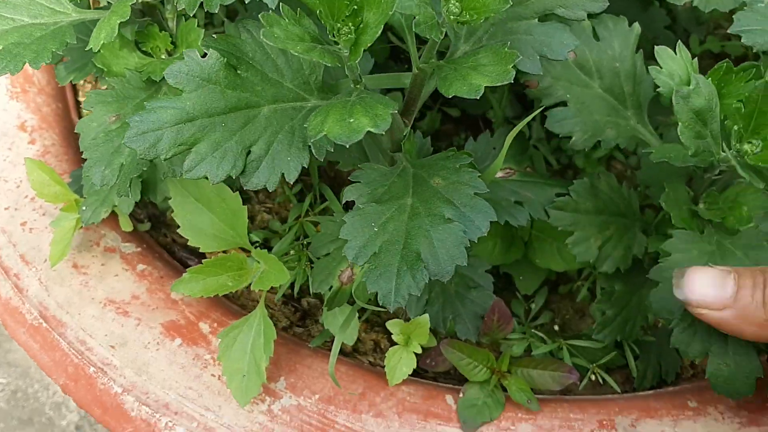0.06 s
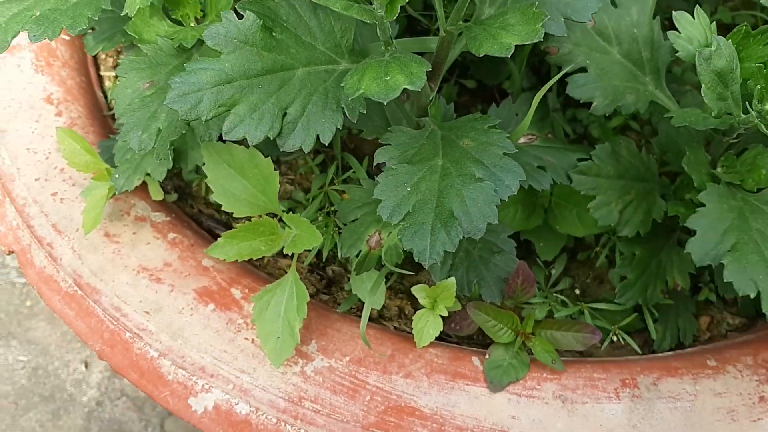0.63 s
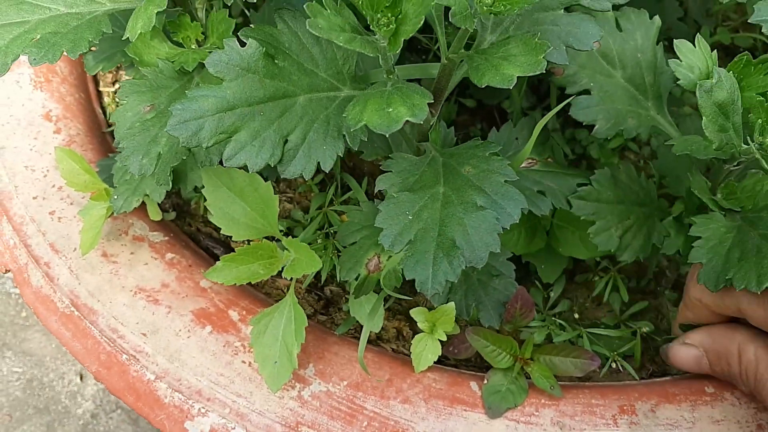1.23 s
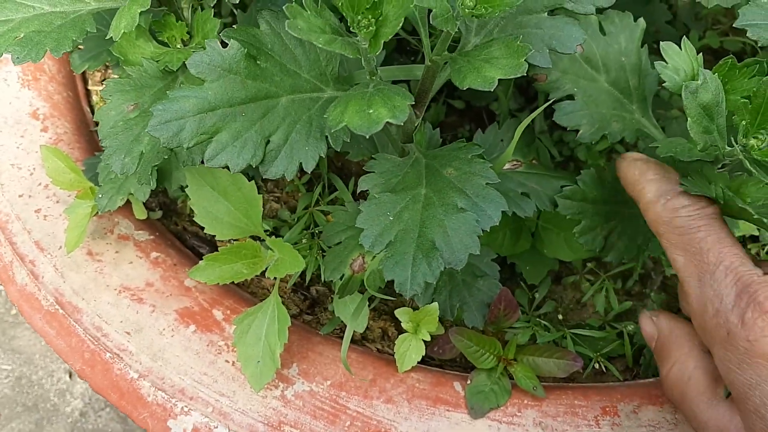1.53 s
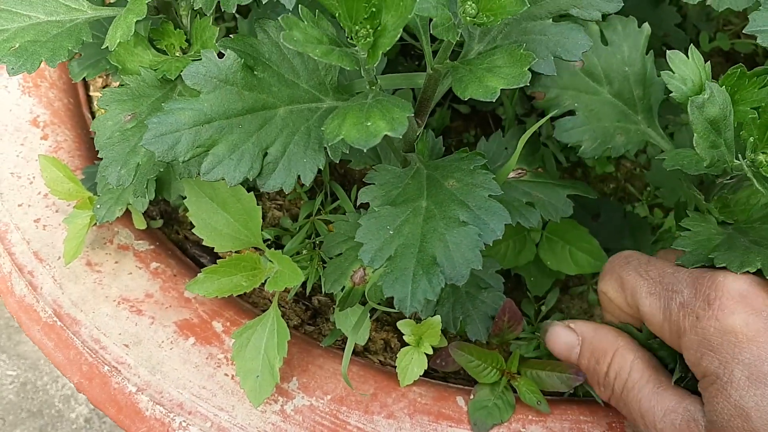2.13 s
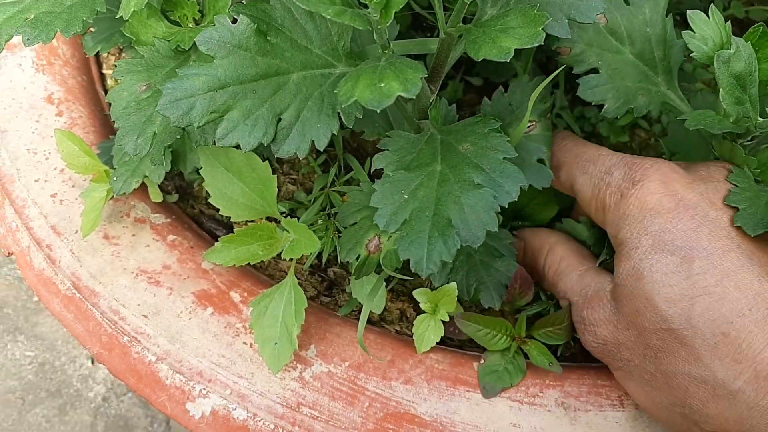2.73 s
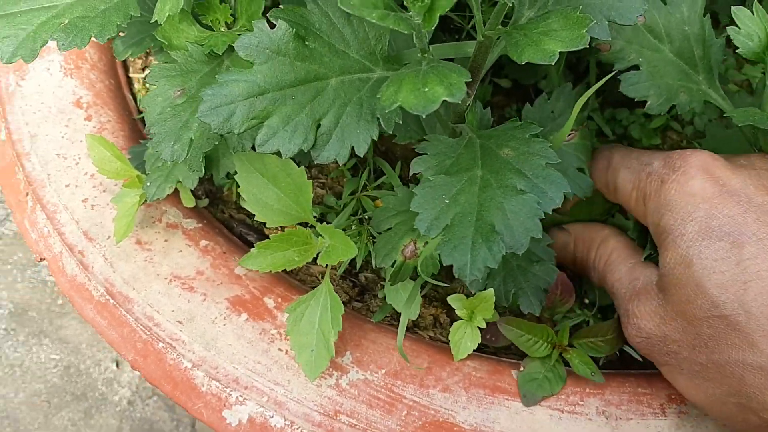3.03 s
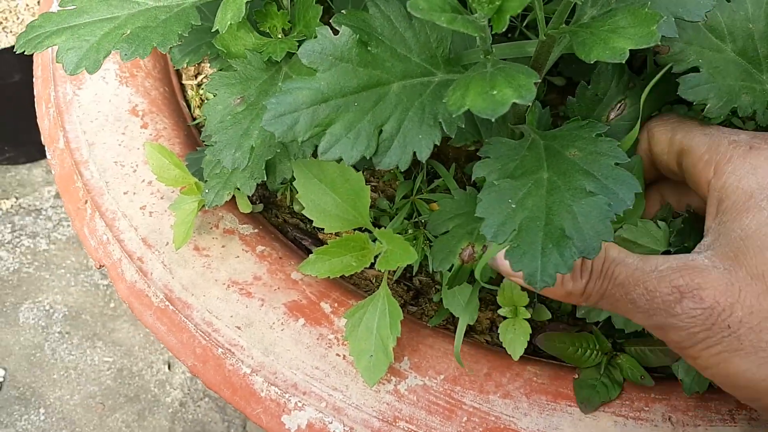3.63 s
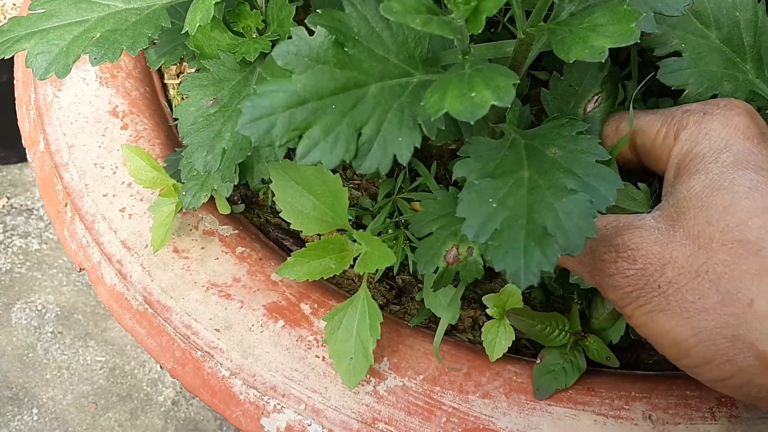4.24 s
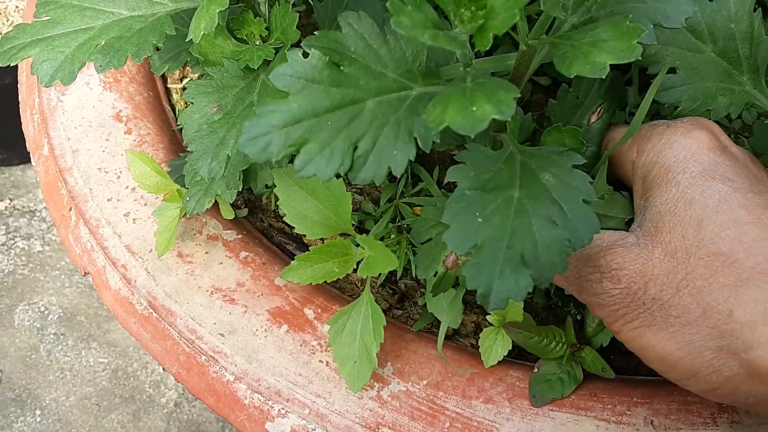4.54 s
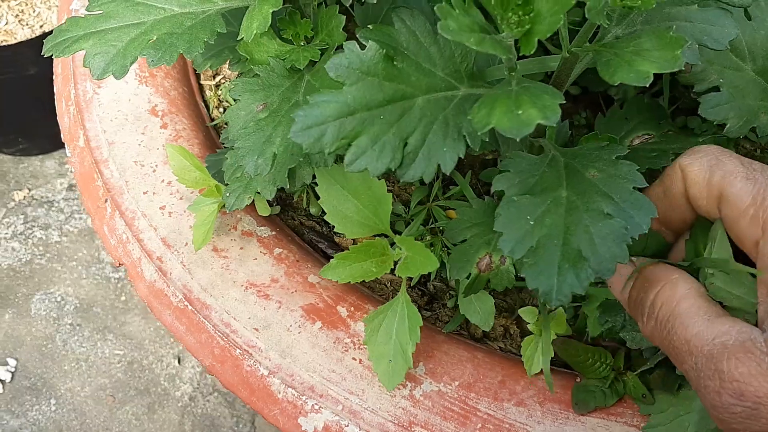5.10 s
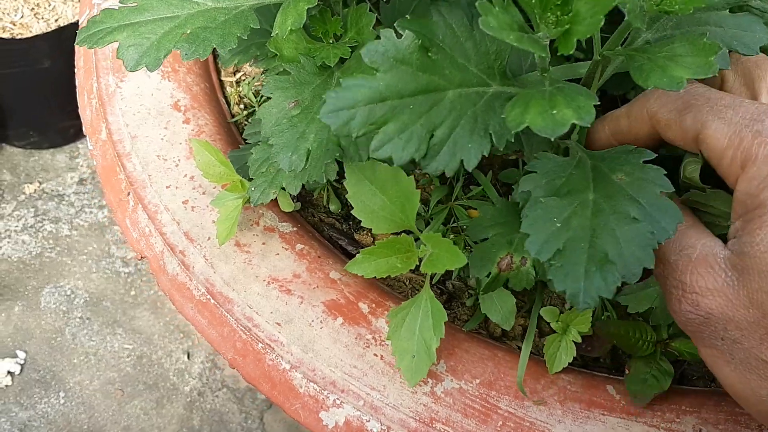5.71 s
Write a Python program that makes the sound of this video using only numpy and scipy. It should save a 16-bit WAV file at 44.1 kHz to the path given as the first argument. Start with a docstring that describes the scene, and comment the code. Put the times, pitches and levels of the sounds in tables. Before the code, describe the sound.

Leaves rustle and crackle close by as a hand pulls weeds from a clay pot, with small, sharp stem snaps.

```python
"""Outdoors at a clay plant pot, a hand pulling weeds close to the left microphone.
Leaves slide over skin and each other in dense tiny slips; stems snap, and one gives a short wet squeak.
The right microphone is shaded from the plant and hears it largely off nearby surfaces.
Dull bumps and scuffs from soil and pot sit near the middle, over a faint far rumble and airy hiss."""
import sys
import numpy as np
from scipy import signal
from scipy.fft import rfft, irfft, next_fast_len
from scipy.io import wavfile
from scipy.ndimage import uniform_filter1d, map_coordinates

SR = 44100
rng = np.random.default_rng(int(sys.argv[2]) if len(sys.argv) > 2 else 0)


def to_wav(s):
    """Save 16-bit WAV."""
    ch = np.atleast_2d(s).T  # columns
    pcm = np.round(np.clip(ch, -1, 1) * 32767)  # PCM
    wavfile.write(sys.argv[1], SR, pcm.astype(np.int16))


N = 262868

# the hand through the leaves: (start [s], length [s], level [dB], relative fizz [dB], grip [dB])
HAND_STROKES = [(0.026, 0.034, -42, -5.5, -2), (0.085, 0.013, -46, 3, 3.5), (0.14, 0.049, -48.5, 2.5, 0.5),
                (0.253, 0.053, -46, -1.5, -2.5), (0.472, 0.16, -47, -1.5, -13),
                (0.676, 0.15, -44, -1.5, -1), (0.835, 0.077, -46, -0.5, 3), (0.914, 0.11, -41.5, 0, 2),
                (1.135, 0.065, -40.5, 0.5, 1), (1.19, 0.13, -45, -5.5, 0.5), (1.393, 0.03, -36.5, 1, -5),
                (1.559, 0.22, -44.5, -0.5, 4), (1.859, 0.084, -45, -2, -4.5), (1.967, 0.12, -43, 0, 1.5),
                (2.086, 0.062, -46, -7, 7.5), (2.205, 0.049, -40, -5, -2), (2.315, 0.21, -48, -1.5, -7.5),
                (2.613, 0.046, -52.5, 1, 2.5), (2.892, 0.031, -43.5, -3, -2.5), (3.157, 0.13, -48.5, -5, 3),
                (3.333, 0.049, -49, 5, 1.5), (3.474, 0.077, -50.5, -2.5, 4), (3.567, 0.072, -56.5, -5, 2.5),
                (3.685, 0.074, -47, -14, -3.5), (3.802, 0.12, -51, 1, 3.5), (3.951, 0.058, -53.5, -2, 0.5),
                (4.072, 0.16, -58.5, -3.5, -4.5), (4.284, 0.087, -50.5, -1, -5),
                (4.444, 0.05, -49, -3, -11.5), (4.636, 0.11, -48, -3, 1), (4.827, 0.11, -45.5, -1.5, -0.5),
                (4.935, 0.072, -40, 1.5, 2), (5.019, 0.057, -39.5, 1.5, 3.5), (5.114, 0.11, -43.5, 0.5, 1),
                (5.274, 0.078, -49, -0.5, 4.5), (5.373, 0.088, -46.5, -0.5, -1), (5.561, 0.12, -51, -3, -3),
                (5.717, 0.022, -42.5, -3.5, -4.5), (5.763, 0.11, -48, -8, -4)]
# leaves resting against the hand between strokes: (time [s], level [dB])
LEAF_TOUCH = [(0, -53), (0.22, -56.5), (0.42, -52), (0.9, -62), (1.07, -50.5), (1.36, -47.5), (1.83, -54.5),
              (2.05, -49.5), (2.5, -50), (2.72, -57), (2.98, -54.5), (3.1, -59.5), (3.3, -51), (3.8, -52),
              (4.04, -60.5), (4.8, -50), (5.3, -54.5), (5.96, -58.5)]
# stems and leaf ribs breaking:
# (time [s], relative level [dB], relative fizz [dB], relative body [dB], ring [Hz])
STEM_SNAPS = [(0.093, -43, -10, -20, 4570), (0.8863, -37, -1, -24, 5900), (0.947, -33, -4, -26, 3450),
              (1.1455, -27, -3, -18, 5200), (1.4067, -33.5, -3, -39, 4000), (1.4202, -34, 1, -41, 4500),
              (1.434, -32, 1, -40, 4600), (1.442, -46, 12, -26, 4200), (1.4556, -31, 10, -26, 4080),
              (1.5028, -33.5, 2.5, -44, 4200), (1.5603, -37.5, 6.5, -31, 5360),
              (1.5982, -31, -23, -14, 4500), (1.6838, -18.5, -3, -13, 3900), (1.8631, -30, 8.5, -28, 6650),
              (1.899, -33, -1, -18, 7300), (1.956, -23.5, -4.5, -20.5, 4860),
              (2.2538, -17.5, 0.5, -27, 5700), (2.261, -32.5, 4, -14, 6700), (2.5687, -48, 14, -11, 6300),
              (2.944, -44, 11, -31, 6200), (3.1294, -42, 1, -21, 6630), (3.1359, -24.5, -3.5, -15, 5640),
              (3.856, -47, 8, -10.5, 6150), (4.148, -41, -5, -29, 3600), (4.5335, -25.5, -7, -21.5, 6200),
              (4.6409, -33.5, -0.5, -15, 6350), (4.6525, -32.5, -7, -10.5, 5230),
              (4.7027, -38, 0.5, -19, 4720), (4.883, -31, 0, -25, 5460), (5.123, -24, 6.5, -8, 4080),
              (5.3323, -38, -0.5, -20, 5850), (5.7177, -41, -10, -27, 6000), (5.7829, -37, -3, -27, 5600)]
# a stem slipping through the fingers: (time [s], pitch [Hz], relative level [dB])
SQUEAK_PATH = [(5.122, 500, -82), (5.129, 492, -56), (5.14, 490, -51.5), (5.156, 647, -48.5),
               (5.175, 624, -49), (5.19, 643, -48), (5.2, 655, -80)]
# harmonics of that squeak: (multiple of the pitch, relative level [dB])
SQUEAK_HARMONICS = [(1, 5.5), (2, 2.5), (3, 2.5), (4, -16), (6, -11)]
# broad leaves brushing past: (time [s], level [dB], length [s], pitch [Hz])
LEAF_BRUSHES = [(0.287, -68.5, 0.13, 994), (0.58, -60, 0.046, 1150), (0.63, -69, 0.061, 880),
                (0.784, -60.5, 0.065, 915), (.96, -82, 0.047, 785), (1.052, -61, 0.028, 926),
                (1.192, -59.5, 0.069, 1070), (5.218, -55.5, 0.014, 1400)]
# soft knocks in the pot: (time [s], relative level [dB], pitch [Hz])
POT_BUMPS = [(0.099, -50, 309), (0.922, -49.5, 262), (1.147, -46, 587), (1.685, -61, 610),
             (3.135, -38.5, 700), (3.138, -38.5, 310), (3.139, -46.5, 126), (3.584, -60, 171),
             (3.817, -51, 402), (4.079, -49, 126), (4.652, -38, 1050), (4.743, -47, 170)]
# scuffing on soil and pot, and the distant rumble: (time [s], level [dB])
SCUFF_LEVELS = [(0, -75), (0.4, -70.5), (0.8, -77.5), (1.15, -71), (1.45, -76), (1.7, -69), (2.0, -80.5),
                (3.08, -80.5), (3.17, -68), (3.33, -93), (3.62, -80.5), (3.92, -79.5), (4.1, -74),
                (4.42, -81), (4.72, -74), (5.2, -75), (5.45, -75.5), (5.96, -79)]
RUMBLE_LEVELS = [(0, -62.5), (1.8, -64.5), (2.8, -71), (3.5, -71.5), (3.62, -64.5), (3.74, -69.5),
                 (4.7, -64.5), (5.96, -65)]

# spectra of the plant, close up: (frequency [Hz], relative level [dB])
LEAF_SPECTRUM = [(2800, -36), (4300, -2), (5300, 0.5), (6700, -1), (7600, -9.5), (9500, -22)]  # bright sliding
FIZZ_SPECTRUM = [(5500, -48), (7600, -11.5), (8500, -1.5), (10000, 2), (13000, 3.5), (15800, 2.5)]  # highest treble
RASP_SPECTRUM = [(1400, -41), (2200, -7), (3200, -1), (3900, 1.5), (4500, -6.5), (5900, -6.5)]  # gripped leaves
BODY_SPECTRUM = [(250, -27), (700, -16), (1100, -9.5), (1300, -8), (1700, -1), (2150, -3), (3000, -6)]  # flexing blades
CRACK_SPECTRUM = [(1200, -48), (2200, -12.5), (3600, 0), (5300, -1), (6700, 3), (7600, -4), (9500, -29)]  # breaking fibres
# spectra of the soil and the background: (frequency [Hz], relative level [dB])
SCUFF_SPECTRUM = [(120, -27), (220, 5), (330, 2.5), (550, -6.5), (800, -10), (1400, -16)]
RUMBLE_SPECTRUM = [(20, -38), (35, -20), (50, -7.5), (63, -0.5), (78, 2), (92, -2.5), (125, -4.5),
                   (160, -8.5), (220, -19), (400, -35.5)]
AIR_SPECTRUM = [(100, 13), (300, -19), (1000, -7.5), (5000, -18), (16000, -14)]
# shading of the plant at the right microphone: (frequency [Hz], relative gain [dB])
RIGHT_SHADOW = [(200, -11.5), (500, -5), (1000, -11), (2000, -19), (4000, -25.5), (8500, -21), (11000, -24),
                (16000, -43)]


def rustle(levels):
    """Leaf hairs catch and let go close to the microphone: dense grain and sparser ticks."""
    ticks = slips(rate=350, spread_db=3, t60=0.007)
    pressure = amp(0.35 * wobble(17) + 1.54 * wobble(45))  # wanders within a stroke
    out = np.zeros(N)
    for spectrum, level in zip([LEAF_SPECTRUM, FIZZ_SPECTRUM, RASP_SPECTRUM, BODY_SPECTRUM], levels):
        grain = slips(rate=3000, spread_db=2, t60=0.015)
        friction = coloured(patchy(rng.standard_normal(N), depth_db=2.5), spectrum)
        out += level * np.sqrt(0.72 * grain + 0.091 * ticks) * friction
    return pressure * out


def hand_effort(attack_s=0.016, release_s=0.019, arch_db=2.0):
    """Amplitudes of the four rustle registers: strokes take hold and die away over a light touch."""
    t = np.arange(N) / SR
    touch_db, = curves(LEAF_TOUCH)
    touch_grip_db = -1.5 + 0.19 * (touch_db + 59)  # a louder touch grips harder
    power = (registers(fizz_db=-2, grip_db=touch_grip_db) * amp(touch_db)) ** 2
    for start, length, db, fizz_db, grip_db in HAND_STROKES:
        span = slice(*np.searchsorted(t, [start, start + length + 10 * release_s]))
        age = t[span] - start
        shape = np.minimum(age / attack_s, 1) * np.exp(-np.maximum(age - length, 0) / release_s)
        # loudest mid-stroke, where the hand moves fastest
        shape *= amp(arch_db * (np.sin(np.pi * np.minimum(age / length, 1)) - 2 / np.pi))
        power[:, span] += (registers(fizz_db, grip_db) * amp(db) * shape) ** 2
    return np.sqrt(power)


def registers(fizz_db, grip_db):
    """Gain rows for leaf, fizz, rasp and body: a firmer grip makes leaves rasp and their blades flex."""
    rasp_db = -4.5 + grip_db
    body_db = -16 + 1.34 * grip_db
    return amp(np.vstack(np.broadcast_arrays(0, fizz_db, rasp_db, body_db)))


def crackle(leaf_level, level_db=-10, fizz_db=-3):
    """Tiny ribs give way at random, louder the harder the hand works."""
    envelope = np.sqrt(np.abs(slips(rate=86, spread_db=3.5, t60=0.01)))
    pops = envelope * rng.standard_normal((2, N))
    cracks = coloured(pops[0], CRACK_SPECTRUM) + amp(fizz_db) * coloured(pops[1], FIZZ_SPECTRUM)
    return amp(level_db) * leaf_level * cracks


def snaps(crack_t60=0.0023, shiver_t60=0.015, shiver_db=-14, stem_t60=0.0098, resonance_db=5):
    """A stem breaks sharply and rings briefly; the leaf on it shivers a little longer."""
    out, lead = np.zeros(N), 64  # samples ahead of the break
    t = np.maximum(np.arange(SR // 25) - lead, 0) / SR
    attack = 1 - np.exp(-t / 0.00046)
    shape = (amp(-60 * t / crack_t60) + amp(shiver_db - 60 * t / shiver_t60)) * attack
    burst_gain = np.sqrt(0.004 * SR / len(t))  # rms 1 becomes the energy of a 4 ms burst
    for start, db, fizz_db, body_db, hz in STEM_SNAPS:
        fibres = rng.standard_normal((3, len(t))) * shape
        # the stem's own resonance colours the crack of its fibres
        resonant = filtered(fibres[0], lambda f: 1 + amp(resonance_db) / (1 + ((f - hz) / 750) ** 2))
        crack = 1.16 * coloured(resonant, CRACK_SPECTRUM)
        fizz = amp(fizz_db) * coloured(fibres[1], FIZZ_SPECTRUM)
        body = amp(body_db) * coloured(fibres[2], BODY_SPECTRUM)
        ring = 0.41 * unit(np.sin(2 * np.pi * hz * t) * attack * amp(-60 * t / stem_t60))
        add(out, start - lead / SR, amp(db - 2) * burst_gain * (crack + fizz + body + ring))
    return out


def squeak():
    """A moist stem sticks and slips at a rising, slightly unsteady rate."""
    hz, db = curves(SQUEAK_PATH)
    phase = 2 * np.pi * np.cumsum(hz * (1 + 0.031 * wobble(400))) / SR
    tone = sum(amp(level + 1.4 * wobble(120)) * np.sin(k * phase) for k, level in SQUEAK_HARMONICS)
    t = np.arange(N) / SR
    slipping = (t > SQUEAK_PATH[0][0]) & (t < SQUEAK_PATH[-1][0])
    return amp(db + 1) * unit(tone) * slipping


def brushes():
    """Broad leaves sweep past the hand with a soft, hollow sound."""
    t = np.arange(N) / SR
    sweeps = sum(amp(db) * np.exp(-2 * ((t - centre) / length) ** 2) * noise_band(hz, width_hz=340)
                 for centre, db, length, hz in LEAF_BRUSHES)
    return sweeps * np.sqrt(slips(rate=400, spread_db=2.5, t60=0.015))


def bumps(t60_cycles=9.5):
    """Roots give way and knuckles meet soil and pot: heavily damped knocks."""
    out, t = np.zeros(N), np.arange(SR // 4) / SR
    attack = 1 - np.exp(-t / 0.00086)
    for start, db, hz in POT_BUMPS:
        add(out, start, amp(db - 60 * t * hz / t60_cycles) * np.sin(2 * np.pi * hz * t) * attack)
    return out


def drag(start_s=3.97, rise_s=0.052, slowing_s=0.08, from_hz=600, to_hz=270, fade_db_per_s=46):
    """A dull, uneven rub sinks in pitch as it slows and fades."""
    age = np.maximum(np.arange(N) / SR - start_s, 0)
    hz = to_hz + (from_hz - to_hz) * np.exp(-age / slowing_s)
    level = np.minimum(age / rise_s, 1) * amp(-64 - fade_db_per_s * np.maximum(age - rise_s, 0))
    hollow = (0.74 * noise_band(hz, width_hz=150)
              + 0.57 * noise_band(1.1 * hz, width_hz=490)
              + 0.1 * noise_band(2 * hz, width_hz=900))
    return level * hollow


def scuffs():
    """The hand rubs on soil and pot, low and uneven in both microphones."""
    db, = curves(SCUFF_LEVELS)
    grain = np.sqrt(slips(rate=290, spread_db=0.5, t60=0.018))
    return amp(db) * grain * stereo_noise(SCUFF_SPECTRUM, side_db=-2.5)


def outdoors(swell_db=0.4, hiss_db=-75.5):
    """A gently swelling rumble in the distance, under faint, wide hiss."""
    db, = curves(RUMBLE_LEVELS)
    rumble = amp(db + swell_db * wobble(4.05)) * stereo_noise(RUMBLE_SPECTRUM, side_db=-13.5)
    return rumble + amp(hiss_db) * stereo_noise(AIR_SPECTRUM, side_db=3.5)


def microphones(plant, echo_t60=0.099):
    """The left microphone hears the plant directly; the shaded right, largely off nearby surfaces."""
    t = np.arange(SR // 30) / SR
    echoes = rng.standard_normal(len(t)) * amp(-60 * t / echo_t60)
    scattered = signal.fftconvolve(plant, echoes / np.linalg.norm(echoes))[:N]
    left = plant + amp(-41) * scattered
    right = filtered(np.roll(plant, -1) + amp(-2) * scattered, lambda hz: gain(RIGHT_SHADOW, hz))
    return np.array([left, amp(-4) * right])


def slips(rate, spread_db, t60):
    """Power envelope, mean 1, of random unequal slips, rate a second, each dying 60 dB in t60 seconds."""
    onsets = rng.random(N) < rate / SR
    energies = amp(spread_db * np.minimum(rng.standard_normal(N), 2)) ** 2
    decay = amp(-60 / (t60 * SR)) ** 2
    power = signal.lfilter([1], [1, -decay], onsets * energies)
    return power / power.mean()


def patchy(x, depth_db):
    """Each new contact between leaves favours other frequencies."""
    spectra = signal.stft(x, nperseg=256)[2]
    patches = uniform_filter1d(rng.standard_normal(spectra.shape), size=5, axis=0)  # across frequency
    patches = uniform_filter1d(patches, size=14, axis=1)  # across time
    return signal.istft(spectra * amp(depth_db * unit(patches)), nperseg=256)[1][:N]


def noise_band(hz, width_hz):
    """Noise of rms 1 in a resonance whose centre may move."""
    phase = 2 * np.pi * np.cumsum(hz * np.ones(N)) / SR
    return unit(wobble(width_hz) * np.cos(phase) + wobble(width_hz) * np.sin(phase))


def stereo_noise(spectrum, side_db):
    """Mid-side noise as a left-right pair of rms 1; more side makes it wider."""
    mid, side = coloured(rng.standard_normal((2, N)), spectrum)
    return unit(np.array([mid + amp(side_db) * side, mid - amp(side_db) * side]))


def wobble(rate):
    """A smooth random curve, rate knots a second."""
    knots = rng.standard_normal(int(N * rate / SR) + 4)
    return map_coordinates(knots, [np.arange(N) * rate / SR])


def curves(rows):
    """One value per sample for each column after the time."""
    times, *columns = np.transpose(rows)
    return [np.interp(np.arange(N) / SR, times, column) for column in columns]


def coloured(x, spectrum):
    """x shaped by a spectrum, at rms 1."""
    return unit(filtered(x, lambda hz: gain(spectrum, hz)))


def filtered(x, response):
    """x through a frequency response."""
    n = x.shape[-1]
    padded = next_fast_len(2 * n)
    return irfft(rfft(x, padded) * response(np.fft.rfftfreq(padded, 1 / SR)), padded)[..., :n]


def gain(points, hz):
    """Gain of (frequency [Hz], level [dB]) points on a log axis, falling away outside them."""
    f, db = np.transpose(points)
    log_hz = np.log(np.r_[f[0] / 2, f, f[-1] * 2])
    return amp(np.interp(np.log(hz + 1), log_hz, np.r_[-100, db, -100]))


def amp(db):
    """Decibels to gain."""
    return 10 ** (np.asarray(db) / 20)


def unit(x):
    """Scale to rms 1."""
    return x / np.sqrt(np.mean(x ** 2) + 1e-20)


def add(track, start_s, sound):
    """Mix a sound into a track at start_s."""
    part = track[max(0, round(start_s * SR)):][:len(sound)]
    part += sound[:len(part)]


def scene():
    """The plant close on the left, soil and pot near the middle, the rumble far off."""
    levels = hand_effort()
    plant = rustle(levels) + crackle(levels[0]) + snaps() + brushes() + squeak()
    slightly_left = amp([[1], [-1]])
    return microphones(plant) + (bumps() + drag()) * slightly_left + scuffs() + outdoors()


def record(dry):
    """The recorder cuts off steeply at its band limit."""
    top_hz = 15950
    return filtered(dry, lambda hz: 1 / np.sqrt(1 + (hz / top_hz) ** 160))


dry = scene()
out = record(dry)
to_wav(out)
```